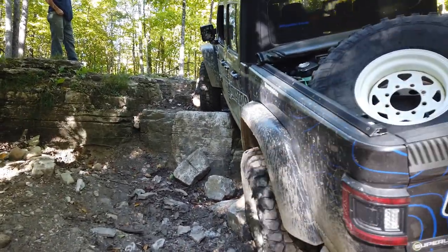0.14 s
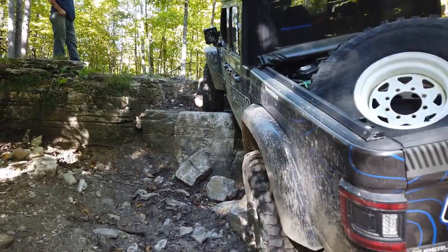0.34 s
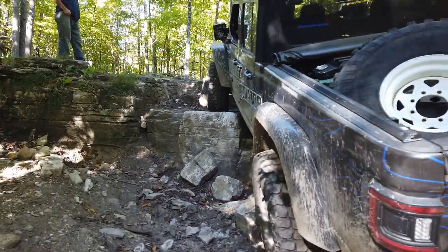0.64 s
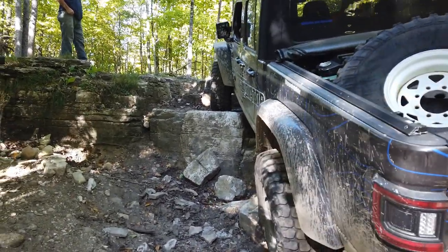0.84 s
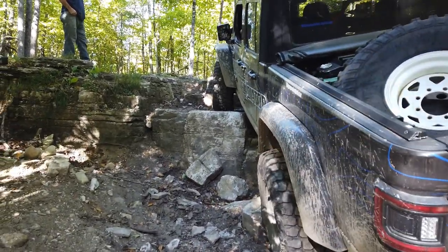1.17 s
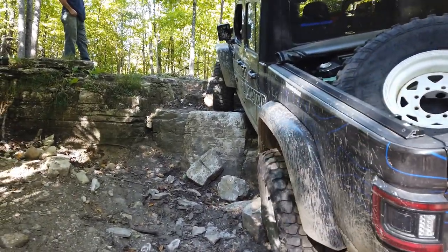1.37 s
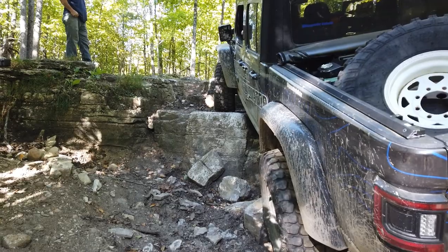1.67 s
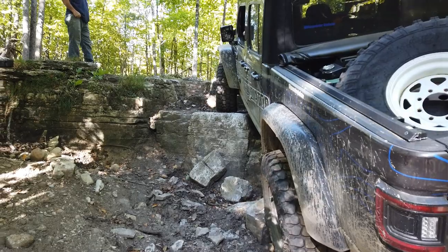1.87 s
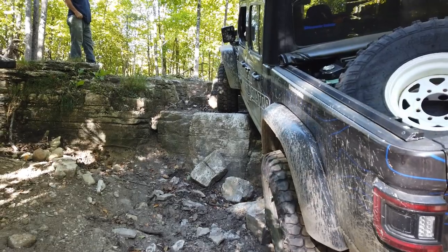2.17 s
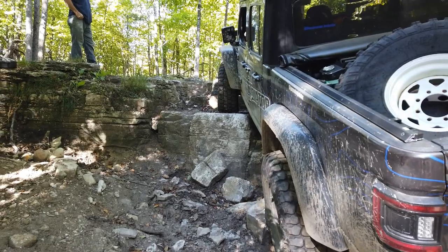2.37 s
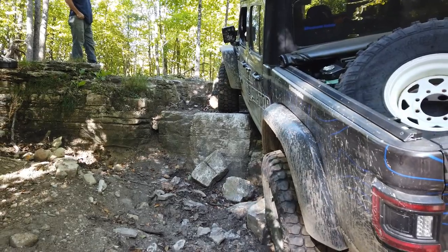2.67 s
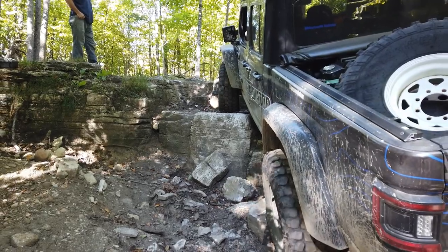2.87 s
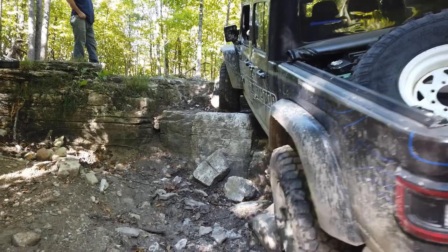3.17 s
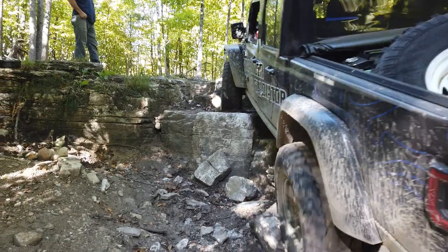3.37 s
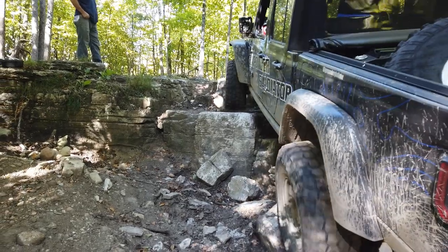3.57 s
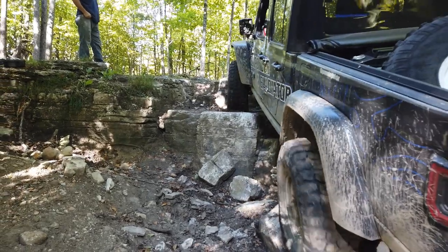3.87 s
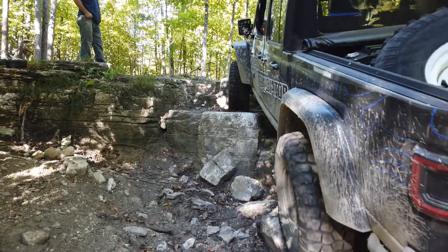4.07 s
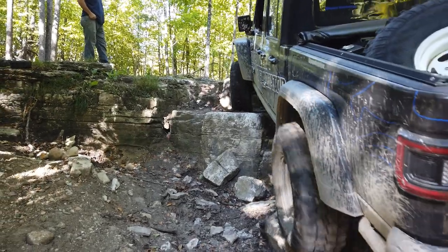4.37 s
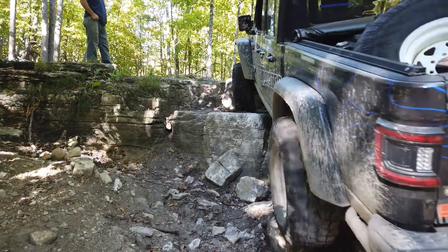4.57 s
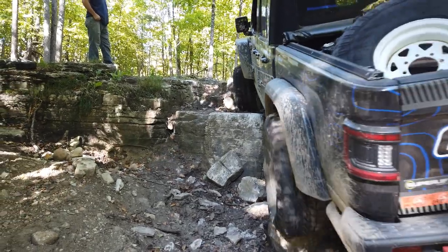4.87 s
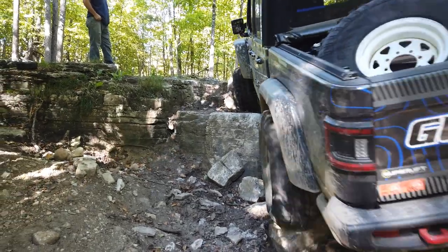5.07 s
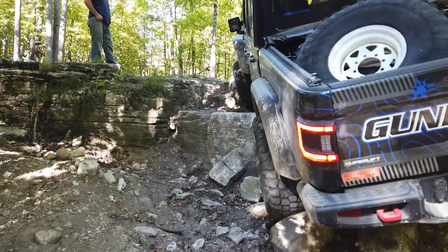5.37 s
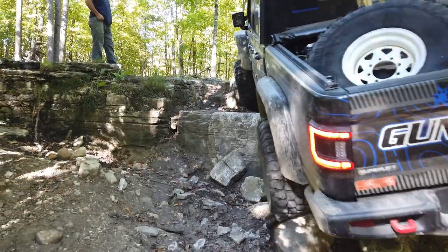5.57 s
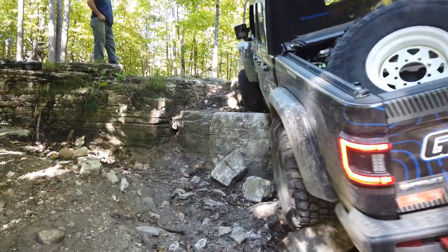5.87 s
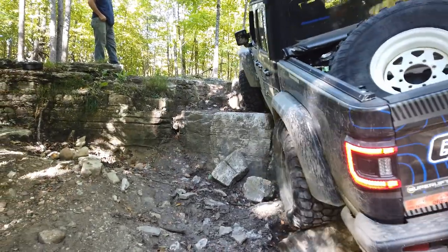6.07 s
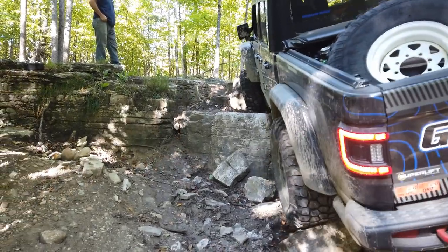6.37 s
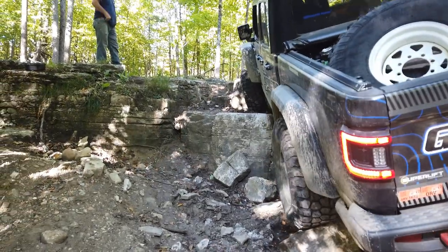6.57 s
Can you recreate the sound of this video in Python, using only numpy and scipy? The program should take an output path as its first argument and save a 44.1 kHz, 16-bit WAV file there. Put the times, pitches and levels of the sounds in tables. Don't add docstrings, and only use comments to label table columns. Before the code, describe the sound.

Close behind a truck crawling over rocks in a quiet wood, its low lumpy idle pulses centrally as stones knock sharply at 0.1 s, with more clacks and gritty tyre slips until 0.8. The exhaust swells to a growl around 1.1 s, then sinks to a slow throb near 1.9, with the tyres almost silent. From 2.1 s it climbs steadily; a loose metal panel slaps and rattles from 2.3 to 3.0. Rubber groans briefly at 3.0, rocks grind, and at 3.5-3.9 heavy low suspension thumps land, strongest near 3.65, amid crunching gravel. The high revs ease by 4.5 s, with smaller bumps, grinding and pebble ticks. Another push peaks at about 5.4 s, then the throttle lifts; stones scatter, dirt sprays and a hard frame knock hits at 5.8. The engine falls unevenly, sputtering and rattling, to 6.7 s over faint forest air.

```python
import sys
import numpy as np
from scipy import signal
from scipy.fft import rfft, irfft
from scipy.io import wavfile
from scipy.ndimage import uniform_filter1d

SR = 44100
rng = np.random.default_rng(int(sys.argv[2]) if len(sys.argv) > 2 else 0)


def bounce(signal):
    frames = np.transpose(np.atleast_2d(signal))
    limited = np.clip(frames, -1, 1)
    pcm = np.round(limited * 32767).astype(np.int16)
    wavfile.write(sys.argv[1], SR, pcm)


def invert_db(level):
    return 10 ** (np.asarray(level, dtype=float) / 20)


N = 296352

# freq_hz, level_db (per Hz)
AIR_COLOUR = [(190, -23), (330, -12.5), (401, -34), (672, -13), (1090, -33.5), (2450, -7.5), (3790, -18),
              (10100, -23.5), (12500, -37), (13400, -70), (15700, -65)]
AIR_DB = -65.5
# freq_hz, likeness (0-1)
LIKENESS = [(60, 0.85), (180, 0.9), (550, 0.92), (1650, 0.83), (4970, 0.18), (15000, 0.19)]

# start_s, level_db (peak), pitch_hz, t60_s
THUMPS = [
    (.02, -72, 60, .15),
    (3.499, -21, 47.8, 0.37),
    (3.657, -7.5, 53.4, 0.14),
    (3.8, -18.5, 59.4, 0.17),
    (3.92, -28.5, 54.2, 0.55),
    (4.433, -31.5, 45.8, 0.13),
    (4.539, -23.5, 45.4, 0.21),
    (5.699, -39, 52, 0.14),
    (5.782, -8, 148.5, 0.063),
]

# start_s, level_db (peak), pitch_hz
SLAPS = [(2.27, -51, 3170), (2.3326, -42.5, 2460), (2.3646, -62, 2360), (2.39, -44, 2680),
         (2.45, -45, 2920), (2.5087, -53, 2580), (2.5576, -39, 2550), (2.61, -36.5, 2530),
         (2.6574, -39.5, 2560), (2.7063, -49, 2500), (2.7435, -52, 2570), (2.7632, -46, 2500),
         (2.804, -43, 2430), (2.826, -38, 2390), (2.8413, -33, 2600), (2.8769, -38, 2700),
         (2.8935, -39, 2620), (2.9276, -40, 2820), (2.9443, -35, 2450), (2.9911, -51, 2570),
         (3.0121, -41, 2420)]
# start_s, level_db (peak), pitch_hz
CLACKS = [(2.6178, -41, 1450), (2.7011, -51, 1330), (2.7445, -53, 1380), (2.7615, -44, 1420),
          (2.8029, -45, 1240), (2.8223, -41, 1460), (2.8403, -37, 1480), (2.8602, -29, 1430),
          (2.8952, -37, 1420), (2.9281, -46, 1270), (2.534, -39, 651), (2.7, -35, 614), (2.722, -44, 579),
          (2.745, -33, 804), (2.802, -35, 615), (2.84, -33, 616), (2.874, -44, 614), (2.926, -35, 900),
          (2.943, -28, 721), (2.969, -28, 630)]
SLAP_T60_S, SLAP_DB = .04, -2
# start_s, length_s, level_db (peak), pitch_hz
GRINDS = [(4.41, .05, -28, 720), (4.645, .045, -32, 700), (4.62, .075, -34, 1200), (4.722, .035, -26, 1300),
          (4.725, .03, -30, 780), (4.875, .075, -32, 1200), (4.88, .03, -30, 680), (4.995, .07, -31, 720),
          (3.135, .03, -28, 600), (3.2, .07, -27, 580), (5.9, .04, -31, 620), (6.085, .03, -32, 1050),
          (4.435, .03, -35, 1500), (4.53, .05, -36, 1150), (4.1, .12, -34, 600), (3.01, .04, -28, 330)]
GRAINS_PER_S = 55
# start_s, length_s, level_db, start_hz, top_hz, end_hz
GROANS = [
    (2.955, .11, -40, 1010, 1150, 1130),
    (2.95, .1, -33, 610, 690, 640),
    (3.03, .08, -38, 880, 880, 720),
    (3.04, .07, -38, 640, 620, 560),
]

# start_s, level_db (peak), pitch_hz
STONES = [(.246, -36, 980), (0.358, -30.5, 1960), (0.435, -35, 950), (0.519, -33.5, 1150),
          (0.734, -36, 1920), (0.751, -34, 1200), (1.639, -50, 1320), (2.612, -42, 1730), (2.8, -33, 810),
          (3.015, -34, 1400), (3.12, -28, 1220), (3.206, -27, 750), (3.435, -36, 1050), (3.5, -26, 1360),
          (3.675, -28.5, 1530), (3.896, -25.5, 2160), (4.832, -28.5, 1270), (5.411, -27, 880),
          (5.567, -25.5, 2380), (6.026, -25.5, 780), (6.461, -48, 855), (6.662, -39.5, 896)]
STONE_T60_S = 0.12
# start_s, level_db (peak), pitch_hz, t60_s
PEBBLES = [(.33, -50, 6350, 0.062), (0.331, -44, 13500, .05), (4.536, -36, 3180, 0.11),
           (4.78, -33.5, 3200, 0.069), (4.844, -36, 3250, 0.044), (6.184, -32.5, 2680, 0.055),
           (.655, -49, 5300, .06), (0.779, -49, 5300, 0.041), (2.268, -45.5, 3330, 0.05),
           (2.554, -42, 3020, 0.09), (3.435, -61, 8574, 0.034), (3.78, -40, 10200, 0.13),
           (3.852, -43, 7800, .05), (3.89, -56, 10000, .1), (5.474, -38, 5550, 0.19),
           (5.49, -36.5, 10100, 0.21), (5.55, -45, 8500, .06), (5.77, -38, 9300, 0.075),
           (6.369, -49, 5000, 0.23)]
# start_s, level_db (peak), pitch_hz, t60_s
KNOCKS = [(0.033, -21.5, 1230, 0.099), (0.042, -31, 950, 0.052), (.078, -20, 1200, 0.065),
          (.086, -14.5, 960, 0.07), (.097, -28, 1300, 0.051), (.107, -25, 840, 0.044),
          (.192, -30.5, 1880, 0.039), (.561, -23, 1110, 0.027), (0.5608, -25, 2180, 0.098),
          (0.597, -26, 1530, 0.023), (0.598, -36, 3800, 0.011), (0.603, -25.5, 2600, 0.11),
          (0.626, -35, 2200, 0.049), (4.992, -26, 1510, 0.028), (4.9932, -27, 800, .02),
          (5.476, -53, 4960, 0.056)]

# time_s, level_db
SPIN = [(0, -52), (.55, -50.5), (.8, -51), (1.1, -58), (1.35, -62), (2.25, -66), (2.67, -51), (3.1, -51.5),
        (3.45, -41.5), (3.9, -41.5), (4.05, -47.5), (4.34, -49.5), (4.55, -45.5), (5.3, -45), (5.45, -50),
        (6.1, -48), (6.42, -51.5), (6.53, -61.5)]
# start_s, level_db, brightness_db, fade_s
SLIPS = [(0.033, -51, -10.5, 0.038), (0.086, -46, -5.5, 0.053), (0.333, -46, 16.5, 0.092),
         (0.567, -43, 8.5, 0.068), (0.646, -60.5, 28.5, 0.05), (0.743, -43.5, -2.5, 0.026),
         (2.982, -42.5, -4, 0.19), (3.131, -41, 3.5, 0.19), (3.434, -32.5, 5, 0.012),
         (3.546, -35.5, 7, 0.025), (3.746, -36.5, 8.5, 0.05), (3.82, -73, -11, 0.03),
         (3.885, -53.5, 21, 0.053), (4.427, -60, -16.5, 0.022), (4.538, -43.5, 7, 0.13),
         (4.65, -36.5, 1, 0.057), (4.723, -36, 1.5, 0.034), (4.881, -45, -2, 0.03),
         (4.389, -48.5, -2, 0.052), (5.402, -44, 5, 0.097), (5.475, -39, 9.5, 0.16), (5.575, -42, 5, 0.019),
         (5.703, -38, 5.5, 0.071), (5.753, -42, 11.5, 0.084), (5.9, -43, 7, 0.19), (6.023, -39, 5, 0.1),
         (6.47, -65, -15, 0.019), (6.672, -54, 2.5, 0.014)]
SLIP_RISE_S, SPRAY_DB = .007, -15.5
# firing_rate_hz, level_db
DRAG_GAIN = [(30, 0), (45, -3), (62, 4.5), (72, 0.5), (85, 5), (103, 7)]
# freq_hz, level_db (per Hz)
SCRUB_COLOUR = [(190, -34), (330, 2), (388, -0.5), (425, 0), (688, 0), (931, -59), (1200, -17.5),
                (1560, -63.5), (2640, -120)]
CRUNCH_COLOUR = [(470, -13), (800, 0.5), (958, -4), (1290, -3.5), (2280, -3), (2770, -6), (3510, -22.5),
                 (4200, -17.5), (5460, -52), (9240, -120)]
SPRAY_COLOUR = [(1940, -24), (3300, 4), (3500, -5), (3810, -8.5), (5110, 1), (6720, -3.5), (10300, 0),
                (11800, -14.5), (12900, -14), (14900, -10), (15700, -18.5)]
RUMBLE_COLOUR = [(15, -26.5), (35, 8), (60, -3.5), (150, -1), (300, -3.5), (380, -6.5), (600, -73)]

# time_s, firing_rate_hz
REVS = [
    [(0, 30), (.15, 32.5), (.33, 30), (.5, 31.5), (.77, 42.3), (.92, 51.5), (1.04, 61), (1.21, 61.5),
     (1.36, 56)],
    [(1.63, 39), (1.8, 27.8), (1.96, 26.3), (2.08, 31.8), (2.41, 34.3), (2.57, 39), (2.75, 48.8),
     (3.01, 68.5), (3.31, 90.3)],
    [(3.42, 93.4), (3.76, 101.8), (3.9, 103), (4.07, 101.3), (4.2, 97), (4.41, 86.4), (4.52, 84.1),
     (4.85, 83.1), (4.97, 84.8)],
    [(5.05, 89.3), (5.24, 103), (5.39, 108.8), (5.5, 104.5), (5.76, 101.9), (5.99, 93), (6.32, 72),
     (6.43, 59), (6.72, 56)],
]
# time_s, throttle_db
PEDAL = [
    [(0, -1), (.09, -28.5), (.33, -15.5), (.52, -13), (.77, -12), (1.0, -12.5), (1.22, -16), (1.36, -21.5),
     (1.6, -22.5)],
    [(1.78, -26), (1.86, -16.5), (2.08, -16), (2.41, -13), (2.75, -11.5), (3.0, -11.5), (3.31, -9.5),
     (3.42, -15.5), (3.76, -12.5)],
    [(4.15, -16.5), (4.42, -13.5), (4.9, -13.5), (5.06, -9), (5.25, -10), (5.39, -16.5), (5.48, -34.5),
     (5.58, -36.5), (5.68, -23.5)],
    [(5.74, -20), (5.99, -17.5), (6.2, -18), (6.35, -18.5), (6.5, -25), (6.72, -27.5)],
]
FLYWHEEL_S, FULL_DB = 0.06, -10
# time_s, share (0-1)
MISFIRE = [(0, 0), (3.2, 0), (3.4, .04), (5.5, .03), (5.75, .9), (6.4, .95), (6.5, .65)]
# firing_rate_hz, roughness (0-1)
UNEVEN = [(28, .42), (36, .22), (48, .12), (85, .07), (102, .16)]
COAST_S, COAST_ROUGH = 5.4, .14

# freq_hz, width_hz, level_db
PIPE_MODES = [(28.7, 29, -5), (45.1, 11.8, 9.5), (79.6, 12.6, 8), (116, 11, -29)]
SILENCER_MODES = [(148.3, 17.4, 5), (218.7, 71, -3.5), (258.3, 13.4, 2.5), (295, 8.7, -0.5)]
TAIL_MODES = [(619, 25, 11), (700, 55, 1.5), (800, 66, 0), (927, 57, -4)]
OVERTONES = [(297.7, 15.4, 2.5), (383, 31, -0.5)]
SHIELD_MODES = [(1050, 150, -9), (1387, 120, -4.5), (1620, 230, -19), (2570, 150, -12), (2830, 210, -13),
                (3100, 1100, -18.5), (5300, 700, -25)]

# firing_rate_hz, level_db
PIPE_GAIN = [(28, -13.5), (40, -4.5), (49, -1.5), (70, -9), (84, -3.5), (89.5, -5), (94, -8.5), (108, -12)]
SILENCER_GAIN = [(28, -29.5), (40, -23.5), (50, -22.5), (60, -20.5), (80, -19.5), (92, -24.5), (102, -24)]
CHAMBER_GAIN = [(28, 0), (45, 0), (60, -2), (70, 5), (78, 4.5), (84, -4), (95, -2), (105, -0.5)]
TAIL_GAIN = [(30, -53.5), (38, -52.5), (50, -42.5), (62, -40.5), (85, -49), (103, -41.5)]
BANKS_GAIN = [(28, -40), (60, -50), (84, -33.5), (90, -29.5), (94, -24.5), (104, -28.5)]
SHIELD_GAIN = [(30, -51), (38, -59), (50, -43.5), (62, -47.5), (80, -48.5), (100, -59)]


def evened(x):
    return x / np.sqrt(np.mean(x ** 2) + 1e-20)


def steadied(x, size=5000):
    envelope = uniform_filter1d(uniform_filter1d(x ** 2, size), size)
    return x / np.sqrt(abs(envelope) + 1e-20)


def curves(rows):
    s, *columns = np.transpose(rows)
    return [np.interp(np.arange(N) / SR, s, c) for c in columns]


def read(points, hz):
    f, value = np.transpose(points)
    return np.interp(np.log(hz + 1), np.log(f + 1), value)


def add(mix, s, sound):
    part = mix[round(s * SR):][:len(sound)]
    part += sound[:len(part)]


def ring(x, modes):
    out = np.zeros(len(x))
    for k, (hz, width, db) in enumerate(modes):
        r = np.exp(-np.pi * width / SR)
        poles = [1, -2 * r * np.cos(2 * np.pi * hz / SR), r * r]
        out += (-1) ** k * invert_db(db) * (1 - r) * signal.lfilter([1, 0, -1], poles, x)
    return out


def spread(x, colour, patchy_db=0.0):
    hz, _, z = signal.stft(x, SR, nperseg=256, noverlap=192)
    lean = .5 * np.arccos(np.clip(read(LIKENESS, hz), 0, 1))[:, None]
    flips = rng.choice([-1., 1.], N // 40 + 1).repeat(40)[:N]
    other = signal.stft(np.roll(x, 97) * flips, SR, nperseg=256, noverlap=192)[2]
    patches = uniform_filter1d(rng.standard_normal(z.shape), size=7, axis=0)
    patches = evened(uniform_filter1d(patches, size=18, axis=1))
    shared, apart = np.cos(lean) * z, np.sin(lean) * other
    pair = np.array([shared + apart, shared - apart])
    pair *= invert_db(read(colour, hz)[:, None] + patchy_db * patches)
    return evened(signal.istft(pair, SR, nperseg=256, noverlap=192)[1][:, :N])


def controls():
    rate = uniform_filter1d(curves(sum(REVS, []))[0], size=int(FLYWHEEL_S * SR))
    return rate, curves(sum(PEDAL, []))[0] - FULL_DB


def forest_air():
    return invert_db(AIR_DB) * spread(rng.standard_normal(N), AIR_COLOUR)


def thumps():
    out, t = np.zeros(N), np.arange(15000) / SR
    for s, db, hz, t60 in THUMPS:
        add(out, s, invert_db(db - 60 * t / t60) * np.sin(2 * np.pi * hz * t) * np.minimum(t / 0.007, 1))
    return out


def panel_slaps():
    out, t = np.zeros(N), np.arange(4000) / SR
    for s, db, hz in SLAPS + CLACKS:
        tone = np.sin(2 * np.pi * hz * t) + .4 * np.sin(2.3 * np.pi * hz * t)
        add(out, s, invert_db(db + SLAP_DB - 60 * t / SLAP_T60_S) * np.minimum(t * 1e3, 1) * tone)
    return out


def grinding():
    out, t = np.zeros(N), np.arange(4000) / SR
    draws = rng.standard_normal((len(GRINDS), 2, len(t)))
    for (s, length, db, hz), (noise, luck) in zip(GRINDS, draws):
        grains = 0.21 + np.exp(-4 * ((t * GRAINS_PER_S + np.cumsum(luck) / 90) % 1))
        stroke = np.sin(np.pi * np.clip(t / length, 0, 1)) ** .5
        rasp = ring(stroke * grains * noise, [(hz, 0.17 * hz, 0), (1.23 * hz, 0.53 * hz, -5)])
        add(out, s, invert_db(db) * rasp / abs(rasp).max())
    return out


def groans():
    out = np.zeros(N)
    for (s, length, db, *hz), noise in zip(GROANS, rng.standard_normal((len(GROANS), 6000))):
        u = np.arange(0, length, 1 / SR) / length
        glide = uniform_filter1d(np.interp(u, [0, .6, 1], hz), size=600)
        pitch = glide * (1 + 0.42 * uniform_filter1d(noise, size=300)[:len(u)])
        add(out, s, invert_db(db) * np.sin(np.pi * u) * np.sin(2 * np.pi * np.cumsum(pitch) / SR))
    return out


def stones():
    out, t = np.zeros(N), np.arange(4000) / SR
    hits = [(*row, 2.4e4) for row in KNOCKS]
    hits += [(*row, STONE_T60_S, 8e3) for row in STONES] + [(*row, 8e3) for row in PEBBLES]
    for (s, db, hz, t60, click), noise in zip(hits, rng.standard_normal((len(hits), len(t)))):
        band = signal.butter(3, [hz / 2.4, 1.5 * hz], "band", fs=SR, output="sos")
        body = evened(ring(noise, [(.65 * hz, .3 * hz, -4), (hz, .3 * hz, 0), (1.25 * hz, .4 * hz, -7)]))
        crack = 1.2 * np.exp(-t / .002) * evened(signal.sosfilt(band, noise)) - click / hz * (t == 0)
        add(out, s, signal.sosfilt(band, invert_db(db - 7 - 60 * t / t60) * (body + crack)))
    return out + 0.07 * np.array([[1], [-1]]) * np.diff(out, prepend=0)


def grip():
    t, spin_db = np.arange(N) / SR, curves(SPIN)[0]
    scrub_db = spin_db + read(DRAG_GAIN, controls()[0])
    power = invert_db(2 * np.array([scrub_db, spin_db, 1.05 * spin_db - 8.0]))
    for s, db, bright_db, fade in SLIPS:
        rise = np.clip((t - s) / SLIP_RISE_S + 1, 0, 1) ** 2
        swell = rise * np.exp(-2 * np.clip(t - s, 0, 1) / abs(fade))
        levels = np.array([[db - 1.82 * bright_db + 0.5], [db], [db + bright_db + SPRAY_DB]])
        power += invert_db(2 * levels) * swell
    return 10 * np.log10(power)


def grit(per_s, spread_db, tail_s):
    cracks = invert_db(spread_db * np.minimum(rng.exponential(1, N), 4)) * (rng.random(N) < per_s / SR)
    bursts = signal.oaconvolve(cracks ** 2, np.exp(-np.arange(2000) / (tail_s * SR)))[:N]
    return np.sqrt(abs(bursts) / bursts.mean() + .5) * rng.standard_normal(N)


def tyres():
    scrub_db, crunch_db, spray_db = grip()
    coarse, fine = grit(120, 0.92, 0.015), grit(270, 0.74, 0.0045)
    hz = np.fft.rfftfreq(N, 1 / SR)
    rumble = evened(irfft(rfft(rng.standard_normal(N)) * invert_db(read(RUMBLE_COLOUR, hz)), N))
    scrub = spread(coarse, SCRUB_COLOUR, patchy_db=2.0)
    crunch = spread(coarse + 0.68 * fine, CRUNCH_COLOUR, patchy_db=2.5)
    spray = spread(grit(90, 1.7, 0.067), SPRAY_COLOUR, patchy_db=1.5)
    out = invert_db(scrub_db - 1.0) * scrub + invert_db(crunch_db) * crunch
    return out + invert_db(spray_db) * spray + invert_db(1.13 * scrub_db + 11) * rumble


def shield(at, rate, throttle_db, misfire):
    out = np.zeros(N)
    for mode, (luck, lag) in zip(SHIELD_MODES, rng.standard_normal((len(SHIELD_MODES), 2, 2000))):
        knocks = np.zeros(N)
        late = (50 * lag[:len(at)]).astype(int)
        knocks[np.clip(at + late, 0, N - 1)] = invert_db(3.0 * luck[:len(at)])
        shake = signal.oaconvolve(knocks, np.exp(-np.arange(1500) / 170.))[:N] * rng.standard_normal(N)
        low_db = (mode[0] < 2000) * (4.2 * throttle_db + 2.5 - 4 * misfire)
        out += invert_db(mode[2] + low_db) * evened(ring(ring(shake, [mode]), [mode]))
    level_db = 3.3 * throttle_db + read(SHIELD_GAIN, rate * (1 - 0.25 * misfire)) + 19.0 * misfire
    return invert_db(level_db) * steadied(out, size=8000)


def underbody(x, t60=0.2, wet_db=-10):
    t = np.arange(12000) / SR
    tail = rng.standard_normal(len(t)) * invert_db(-60 * t / t60) * (t > .006)
    return x + invert_db(wet_db) * evened(signal.oaconvolve(x, tail)[:N]) * np.sqrt(np.mean(x ** 2))


def firings(rate, turns, misfire):
    coasting = np.clip((np.arange(N) / SR - COAST_S) * 10, 0, 1)
    rough = read(UNEVEN, rate) + COAST_ROUGH * coasting
    at = np.flatnonzero(np.diff(np.floor(turns)))
    chance = rng.standard_normal((2000, 2))[:len(at)]
    weak = misfire[at] * (np.arange(len(at)) % 2)
    late = (rough[at] * chance[:, 1] * SR / rate[at] / 20).astype(int)
    pulses = np.zeros(N)
    pulses[np.clip(at + late, 0, N - 1)] = (1 - weak) * (1 + .5 * rough[at] * chance[:, 0])
    gust = rough * evened(np.exp(-(turns % 1) / 4.8) * rng.standard_normal(N))
    return at, steadied(pulses), gust


def engine():
    rate, throttle_db = controls()
    misfire = np.clip(curves(MISFIRE)[0], 0, 1)
    turns = np.cumsum(rate) / SR
    at, pulses, gust = firings(rate, turns, misfire)
    drive = pulses + .7 * gust
    muffle = signal.butter(10, 322, fs=SR, output="sos")

    boom_db = FULL_DB + throttle_db + read(PIPE_GAIN, rate * (1 - .5 * misfire))
    boom = -steadied(ring(signal.sosfilt(muffle, pulses + 0.55 * gust), PIPE_MODES))

    bark_db = 0.86 * throttle_db + read(SILENCER_GAIN, rate) - 3 * misfire
    muffled = signal.sosfilt(muffle, underbody(signal.sosfilt(muffle, drive)))
    first_chamber = invert_db(read(CHAMBER_GAIN, rate)) * ring(muffled, SILENCER_MODES[:1])
    bark = steadied(first_chamber + ring(muffled, SILENCER_MODES[1:]))

    growl_db = 3.0 * throttle_db + read(TAIL_GAIN, rate)
    tail = ring(drive + 0.2 * gust, TAIL_MODES)
    growl = steadied(ring(ring(tail, [(725, 460, 0)]), [(743, 440, 0)]))

    overtone_db = 0.26 * throttle_db - 47.5 + 6.2 * misfire
    upper = evened(sum(ring(ring(drive, [tone]), [tone]) for tone in OVERTONES))
    overtones = invert_db(overtone_db) * (rate / 80) ** 2.4 * upper

    lope_db = 0.46 * throttle_db + read(BANKS_GAIN, rate) - 3 * misfire
    lope = invert_db(lope_db) * np.clip(rate / 20 - 3, 0, 1) * np.sqrt(2) * np.sin(np.pi * turns)

    exhaust = invert_db(boom_db) * boom + invert_db(bark_db) * bark + invert_db(growl_db) * growl + overtones + lope
    return exhaust + shield(at, rate, throttle_db, misfire)


def scene():
    air = forest_air()
    truck = engine() + thumps()
    lean = invert_db(-30.5) * np.array([[1], [-1]]) * signal.hilbert(truck).imag
    rocks = panel_slaps() + grinding() + groans()
    return truck + lean + tyres() + stones() + rocks + air


def roll_off(x):
    return signal.sosfilt(signal.butter(12, 16710, fs=SR, output="sos"), x)


def record(dry):
    ports = np.array([np.roll(dry[0], 1), dry[1]])
    edge = signal.firwin(511, 15780, window=("kaiser", 9), fs=SR)
    mix = signal.oaconvolve(ports, edge[None], "same")
    return roll_off(mix)


dry = scene()
out = record(dry)
bounce(out)
```